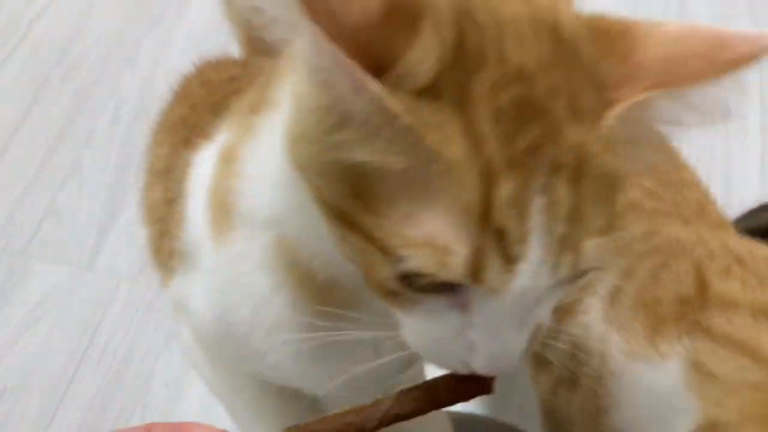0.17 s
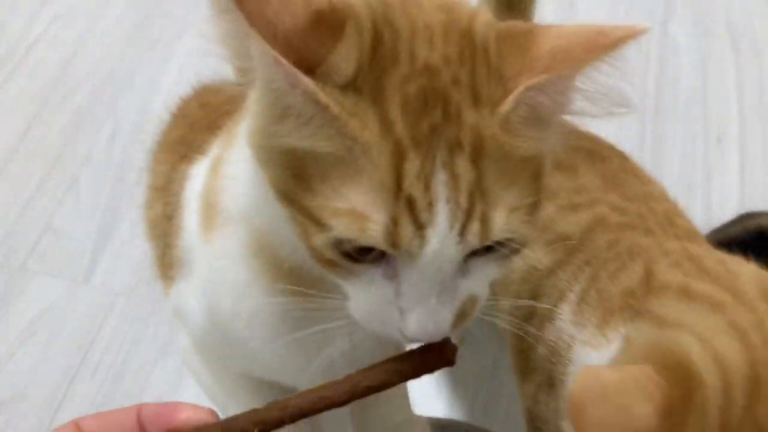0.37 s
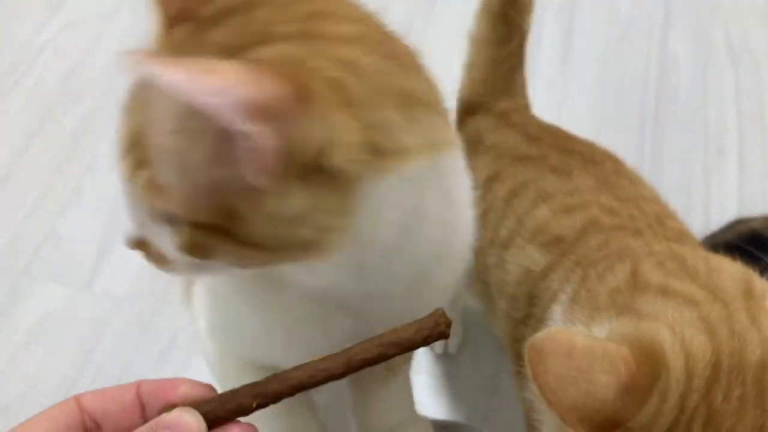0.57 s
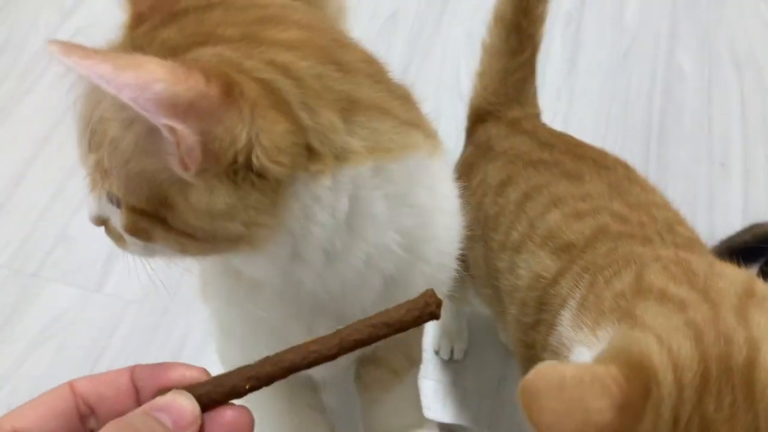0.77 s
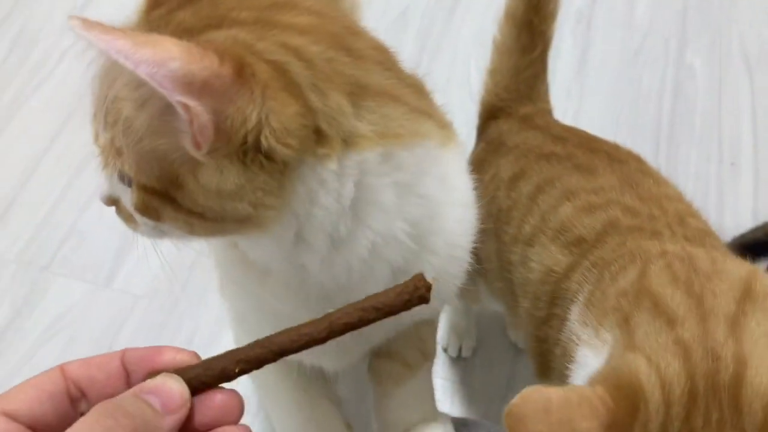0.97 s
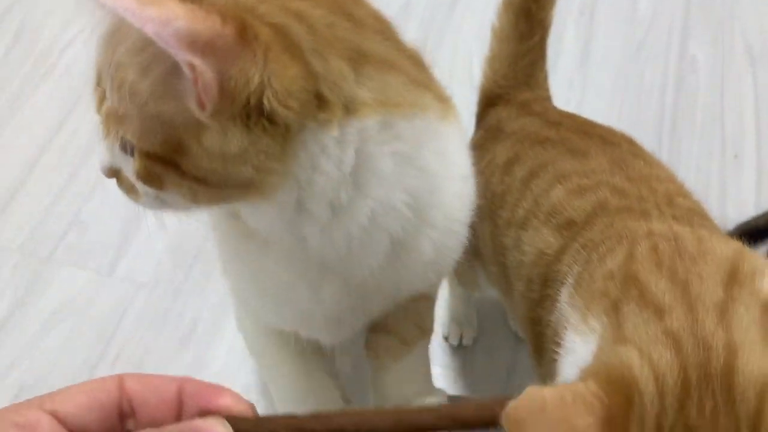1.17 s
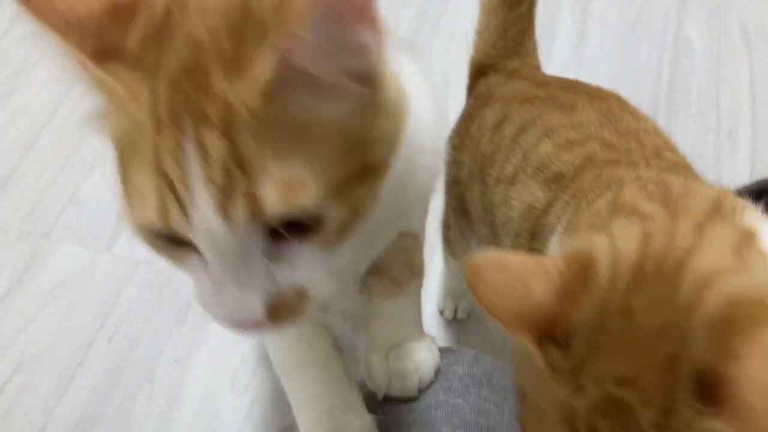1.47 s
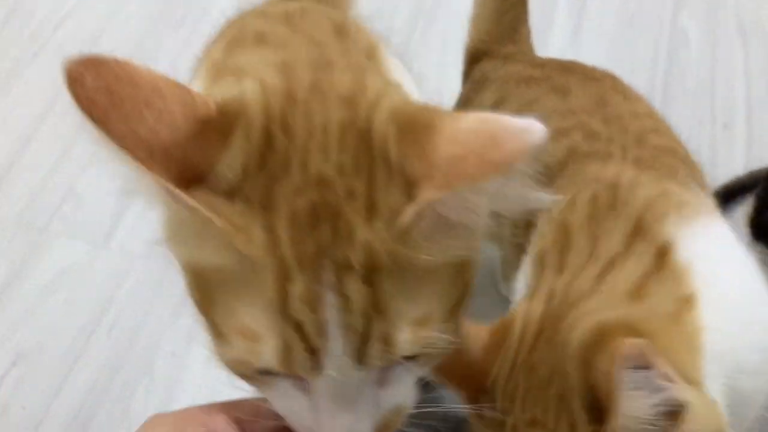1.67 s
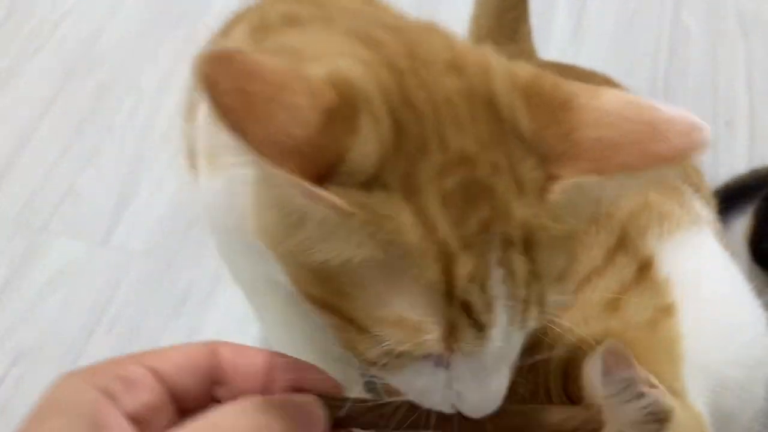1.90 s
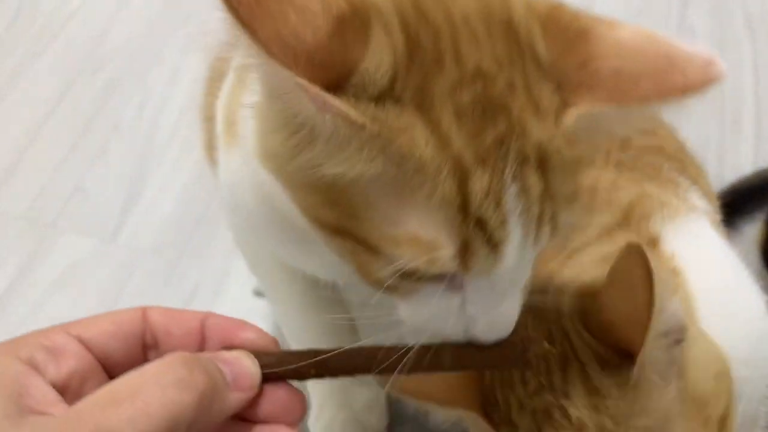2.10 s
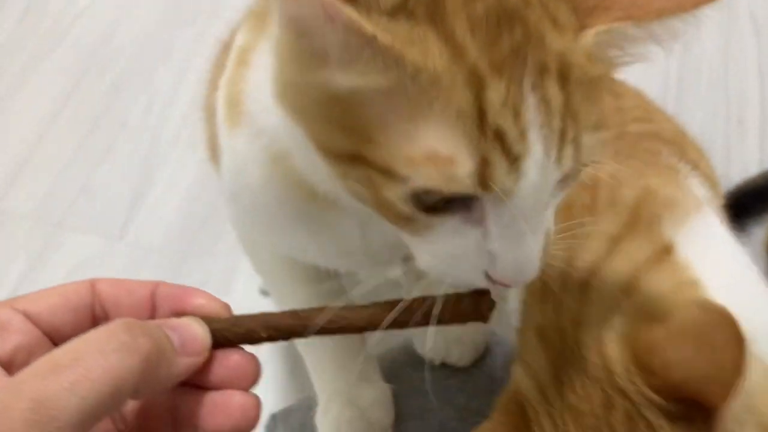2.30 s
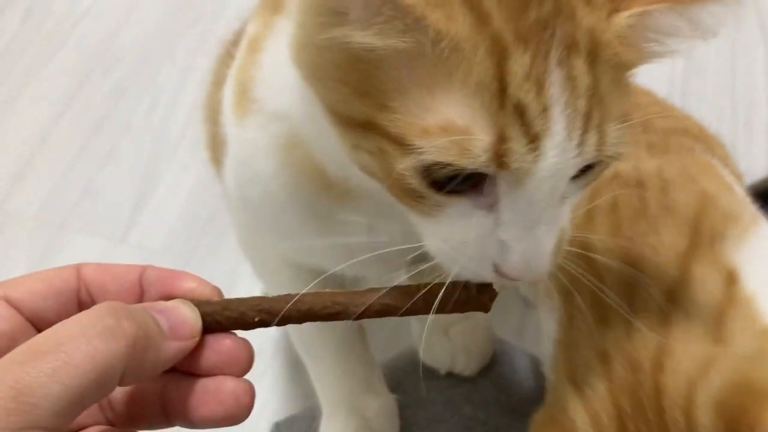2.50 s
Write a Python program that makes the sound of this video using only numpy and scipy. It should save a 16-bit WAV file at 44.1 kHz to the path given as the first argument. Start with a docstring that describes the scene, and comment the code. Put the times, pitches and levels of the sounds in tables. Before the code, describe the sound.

A kitten gnaws a hard treat stick close to a handheld phone in a bare, echoing room. A sharp crack with crumbs comes at 0.22 s, a hollow distant clunk and scuff at 0.4 s fades slowly. Quiet smacks follow, clearest at 1.25 s; low bumps thud from 1.25 to 2.2 s, with light fur rustle. Crunchy snaps cluster at 2.23-2.36 s, then a soft tick at 2.54 s over low rumble.

```python
"""In a bare, ringing room a kitten gnaws a hard treat stick close to a hand-held phone.
Bites are sharp snaps with crumbling noise, smacks are short mouth rings, crumbs are showers of clicks.
Fur brushes past as swells of noise; bumps on the phone and nudges of the stick are soft swings.
Something farther off clunks and scuffs, made of ringing and coloured noise that fades slowly.
A noise tail with a few standing waves is the room's echo; a low noise rumble lies underneath."""
import sys
import numpy as np
from scipy import signal
from scipy.fft import rfft, irfft
from scipy.io import wavfile
from scipy.ndimage import uniform_filter1d

SR = 44100
rng = np.random.default_rng(int(sys.argv[2]) if len(sys.argv) > 2 else 0)


def transcribe(signal):
    """Save signal, clipped to [-1, 1], as a 16-bit WAV file at the path in sys.argv[1]."""
    frames = np.atleast_2d(signal).T
    limited = np.clip(frames, -1, 1)
    pcm = np.round(limited * 32767).astype(np.int16)
    wavfile.write(sys.argv[1], SR, pcm)


N = 116865  # length in samples


def undb(db):
    """Turn decibels into a gain."""
    return 10 ** (np.asarray(db) / 20)


def unit(x):
    """Scale a sound to an average (rms) level of 1."""
    return x / np.sqrt(np.mean(x ** 2) + 1e-24)


def along(points, hz):
    """Read a curve of (pitch_hz, value) points, with pitch on a log scale."""
    p = np.array(points, float)
    return np.interp(np.log(hz + 1), np.log(p[:, 0]), p[:, 1])


def freqs(x):
    """List the frequencies in the spectrum of x."""
    return np.fft.rfftfreq(x.shape[-1], 1 / SR)


def colour(x, points):
    """Make pitches louder or softer along a (pitch_hz, level_db) curve."""
    gain = undb(along(points, freqs(x)))
    return irfft(rfft(x) * gain, x.shape[-1])


def resonate(x, hz, width):
    """Pass x through one resonance twice, so that other pitches fall away steeply."""
    b, a = signal.iirpeak(hz, hz / width, fs=SR)
    once = signal.lfilter(b, a, x)
    return signal.lfilter(b, a, once)


def fade(age, t60_s):
    """Die away by 60 dB in t60_s seconds."""
    return np.exp(-np.log(1000) * age / t60_s)


def swell(t, at_s, half_s):
    """Rise and fall smoothly around at_s."""
    return np.exp(-((t - at_s) / half_s) ** 2 / 2)


def swing(age, hz, cycles):
    """A soft push that swings for about a cycle, with no click."""
    return np.cos(2 * np.pi * hz * age) * np.exp(-(hz * age / cycles) ** 2 / 2)


def grain(depth_db, size):
    """A gain that flickers at random, smoothed over size samples."""
    wander = uniform_filter1d(rng.standard_normal(N), size=size)
    return unit(undb(depth_db * unit(wander)))


def add(out, x, start_s):
    """Mix x into out from a given time."""
    i = max(int(start_s * SR), 0)
    part = x[:, :max(N - i, 0)]
    out[:, i:i + part.shape[1]] += part


# how unlike left and right are in spread-out noise: pitch_hz, share (0-1)
STEREO_SPREAD = [(150, 0.07), (300, 0.34), (700, 1), (4000, 0.67), (5200, 0.18), (16000, 0)]


def stereo_noise(width, size):
    """Left and right noise: the same at width 0, less alike as width grows, nearly alike at both extremes."""
    mid, side = rng.standard_normal((2, size))
    side = irfft(rfft(side) * along(STEREO_SPREAD, freqs(side)), size)
    return unit(np.array([mid + width * side, mid - width * side]))


# shape of the steady background: pitch_hz, relative level_db
RUMBLE_COLOUR = [(20, -16), (45, -9), (68, -1.5), (110, -3.5), (170, -12.5), (270, -12.5), (450, -26.5),
                 (1000, -36.5), (3000, -42), (5300, -46), (8000, -47.5), (11500, -51), (14500, -49)]
RUMBLE_DB, RUMBLE_WIDTH = -45.5, 0.98


def room_rumble():
    """Steady noise, strongest in the lows."""
    noise = stereo_noise(RUMBLE_WIDTH, size=N)
    return undb(RUMBLE_DB) * unit(colour(noise, RUMBLE_COLOUR))


# fur brushing the stick and hand: middle_s, half_length_s, rustle_level_db, hiss_level_db
FUR_BRUSHES = [(0.029, 0.061, -55.5, -78), (0.153, 0.03, -56, -53), (1.749, 0.035, -50.5, -49),
               (1.895, 0.029, -52.5, -55.5), (1.58, 0.12, -56, -74), (1.996, 0.077, -54, -57),
               (2.161, 0.046, -48, -46.5), (2.64, 0.059, -53.5, -57)]
# soft rustle in a brush: pitch_hz, relative level_db
RUSTLE_COLOUR = [(200, -32.5), (500, -1), (1500, 0), (3200, 0.5), (4500, -0.5), (6000, -8), (16000, -25)]
# finer hiss in a brush: pitch_hz, relative level_db
HISS_COLOUR = [(1000, -40), (4000, 0), (5800, 10), (7500, 4), (9500, -8), (11500, -16.5), (14000, 3),
               (16000, -14)]
BRUSH_GRAIN_DB = 1.5  # depth of the flicker


def fur(t):
    """Hairs rub past in swells of fine, grainy friction."""
    flicker = grain(BRUSH_GRAIN_DB, size=200)
    rustle = unit(colour(stereo_noise(0.56, size=N) * flicker, RUSTLE_COLOUR))
    hiss = unit(colour(stereo_noise(0.4, size=N) * flicker, HISS_COLOUR))
    out = np.zeros((2, N))
    for at_s, half_s, rustle_db, hiss_db in FUR_BRUSHES:
        friction = undb(rustle_db) * rustle + undb(hiss_db) * hiss
        out += swell(t, at_s, half_s) * friction
    return out


# cracks and ticks of the teeth, levels before the shared colour below:
# start_s, jaw_db, mouth_db, stick_db, tooth_db, crackle_db
TOOTH_BITES = [ (0.132, -50, -42.5, -50, -50, -48), (0.2218, -45, -28, -23.5, -17.5, -19),
               (0.223, -39, -26.5, -15, -29, -24), (0.2267, -29, -22, -13, -35, -22),
               (.326, -44, -45, -40, -64, -65), (.432, -31.5, -26, -37, -51, -79),
               (.557, -35, -60.5, -53, -65, -79), (1.12, -41.5, -34, -44, -63, -79),
               (1.251, -37.5, -40.5, -41.5, -36, -42.5), (1.464, -60, -46.5, -52, -66, -75),
               (1.516, -41, -46, -52, -56.5, -60), (1.75, -41, -40, -61, -48, -51),
               (1.822, -45, -45, -47.5, -50.5, -74), (1.944, -43.5, -50, -58, -47.5, -85),
               (2.171, -44, -38.5, -45, -64, -42), (2.182, -44, -39.5, -48, -62, -68),
               (2.2265, -43, -28, -33.5, -35, -79), (2.269, -32.5, -46, -32.5, -36, -33),
               (2.289, -63, -26, -20.5, -19, -46), (2.2912, -26.5, -27.5, -21.5, -38, -11.5),
               (2.3051, -33, -49, -21, -29, -44.5), (2.336, -40.5, -35, -21.5, -27, -26),
               (2.3367, -31.5, -20, -19.5, -24.5, -33), (2.3584, -46, -23, -23.5, -22, -24),
               (2.539, -51, -34, -37.5, -47, -60), (2.544, -43.5, -34, -38.5, -49, -75), ]
# where those five levels lie, from jaw to crackle: centre_hz, width_hz
BITE_RANGES = [(400, 546), (1200, 1920), (3200, 3000), (7000, 7700), (14000, 8700)]
# resonances and hollows that all bites share: pitch_hz, level_db
SHARED_BITE_COLOUR = [(80, -17.5), (200, -7.5), (320, 2.5), (600, -2.5), (1000, -0.5), (2200, -4.5),
                      (3000, -1.5), (4300, -2.5), (5200, 3.5), (6300, 4), (11500, -4.5), (13700, -3),
                      (16000, -11.5)]
BITE_DB, LEVEL_WINDOW_S = 1, 0.0052  # added level; time over which a bite's level is counted
BITE_WIDTH = 0.56  # how unlike left and right are
CRUMBLE_MS, CRUMBLE = 0.67, 0.32  # tiny fractures go on after the snap: fade time, gain
# faint noise rising into the snap and fading after it: level against the crumbling, fade time
FAINT_NOISE_DB, FAINT_NOISE_MS = -27, 4.7
SOFT_DB, SOFT_CRUMBLE = -32.5, 0.51  # ticks weaker than this get an extra scrape of this gain
SNAP_EVENNESS = 0.48  # 1 = a perfectly even spectrum before the copy is added
SNAP_COPY, SNAP_COPY_MS = 0.31, 0.8  # inverted copy after each snap: gain, typical delay
LATE_MS, LATE_HZ = 7.525, 310.5  # the lows lag by this much; the lag is halved at this pitch


def bites():
    """Teeth snap and crumble the stick; stick and jaw ring, and the low pitches arrive later."""
    out, size, lead = np.zeros((2, N)), 3072, 1024  # lead = samples kept before the snap
    ms = (np.arange(size) - lead) / SR * 1000
    hz = freqs(ms)
    lag = np.exp(-2j * np.pi * LATE_MS / 1000 * LATE_HZ * np.log1p(hz / LATE_HZ))
    crumble = (ms >= 0) * np.exp(-abs(ms) / CRUMBLE_MS)
    faint_noise = undb(FAINT_NOISE_DB) * np.exp(-abs(ms) / FAINT_NOISE_MS)
    grit = CRUMBLE * (crumble + faint_noise)
    soft_scrape = SOFT_CRUMBLE * np.exp(-abs(ms - CRUMBLE_MS) / (2 * CRUMBLE_MS))
    click = ms == 0
    for start_s, *levels in TOOTH_BITES:
        is_soft = max(levels) < SOFT_DB
        noise = (grit + soft_scrape * is_soft) * stereo_noise(BITE_WIDTH, size=size)
        snap = rfft(noise + click)
        snap = snap / np.mean(abs(snap) ** 2, axis=0) ** (SNAP_EVENNESS / 2)
        # an inverted copy follows at a random short delay, so each bite is coloured differently
        delay_s = SNAP_COPY_MS / 1000 * rng.uniform(0.5, 2)
        snap = snap * (1 - SNAP_COPY * np.exp(-2j * np.pi * hz * delay_s))
        snap = snap / np.sqrt(np.mean(abs(snap) ** 2))
        # a wide range shares its level among more pitches
        density = [(centre, db - 10 * np.log10(width))
                   for (centre, width), db in zip(BITE_RANGES, levels)]
        curve_db = along(density, hz) + along(SHARED_BITE_COLOUR, hz) + BITE_DB
        gain = undb(curve_db) * SR * np.sqrt(LEVEL_WINDOW_S / 2)
        add(out, irfft(snap * gain * lag, size), start_s - lead / SR)
    return out


# wet smacks of the opening mouth: start_s, pitch_hz, level_db
MOUTH_SMACKS = [(.134, 1360, -42.5), (0.797, 995, -34), (1.111, 1140, -33), (1.1205, 2815, -35.5),
                (1.122, 1070, -34), (1.2539, 948, -23.5), (1.465, 1260, -38.5), (1.518, 1090, -35),
                (1.749, 1244, -36), (1.891, 1450, -40.5), (1.943, 1346, -41.5), (2.179, 1035, -36),
                (2.2273, 1050, -25), (2.268, 1275, -27), (2.361, 1430, -24), (2.541, 1178, -26.5)]
SMACK_ATTACK_S, SMACK_T60_S = 0.00061, 0.024  # rise time; time to fade by 60 dB
SMACK_OVERTONE, SMACK_OVERTONE_DB = 1.4, -24  # second tone: times the pitch, level against the first
SMACK_SAG, SMACK_SAG_S = 0.15, 0.0026  # the ring starts this share sharp and settles this fast
SMACK_NOISE = 0.78  # rms level of wet noise beside a ring of peak 1


def smacks():
    """Lips and tongue part and the mouth cavity rings briefly, its pitch sagging."""
    out, age = np.zeros((2, N)), np.arange(2048) / SR
    shape = (1 - np.exp(-age / SMACK_ATTACK_S)) * fade(age, SMACK_T60_S)
    sag = SMACK_SAG * SMACK_SAG_S * (1 - np.exp(-age / SMACK_SAG_S))
    for start_s, hz, db in MOUTH_SMACKS:
        noise = stereo_noise(BITE_WIDTH, size=len(age))
        wet = SMACK_NOISE * unit(resonate(noise, hz, hz))
        phase = 2 * np.pi * hz * (age + sag)
        ring = np.sin(phase) + undb(SMACK_OVERTONE_DB) * np.sin(SMACK_OVERTONE * phase)
        add(out, undb(db) * shape * (ring + wet), start_s)
    return out


# colour of the room's echo: pitch_hz, level_db
ROOM_COLOUR = [(100, -20), (290, -3), (500, -5.5), (1000, -6), (1600, -4), (2300, -6), (4400, -8.5),
               (5600, -12.5), (7000, -8.5), (11000, -15), (13300, -14), (16000, -17.5)]
# how long each pitch takes to fade by 60 dB: pitch_hz, t60_s
ROOM_FADE = [(200, 0.7), (1000, 0.61), (3500, 0.64), (7000, 0.62), (14000, 0.3)]
# standing waves of the room: pitch_hz, level_db, t60_s
STANDING_WAVES = [(283.4, -15.5, 1), (311, -11.5, 0.53), (386.5, -15.5, 0.46)]
ROOM_ONSET_S, ROOM_WIDTH = 0.0009, 0.67
ROOM_GRAIN_DB = 0.5  # reflections arrive in uneven clusters


def room(x):
    """Hard floor and walls scatter sound into a tail with standing waves; the high treble dies first."""
    noise = stereo_noise(ROOM_WIDTH, size=SR) * grain(ROOM_GRAIN_DB, size=200)[:SR]
    hz, age, cells = signal.stft(noise, SR, nperseg=256)  # split into pitches and moments
    rate = np.log(1000) / along(ROOM_FADE, hz)[:, None]
    shape = np.sqrt(2 * rate / SR) * np.exp(-rate * age) * (1 - np.exp(-age / ROOM_ONSET_S))
    tail = signal.istft(cells * shape * undb(along(ROOM_COLOUR, hz))[:, None], SR)[1]
    t = np.arange(tail.shape[1]) / SR
    for mode_hz, db, t60_s in STANDING_WAVES:
        wave = np.sin(2 * np.pi * mode_hz * t) * fade(t, t60_s)
        tail = tail + undb(db) * mode_hz / SR * wave
    mono = x.mean(axis=0)[None]
    return signal.fftconvolve(mono, tail, axes=1)[:, :N]


# soft bumps on the phone: middle_s, pitch_hz, level_db, dull_knock_level_db
PHONE_BUMPS = [ (0.186, 49.74, -38, -54), (1.247, 39.2, -29, -44.5), (1.276, 58.5, -28, -43),
               (1.295, 57.5, -27.5, -58), (1.372, 40.2, -28, -49), (1.424, 64.5, -25.5, -39.5),
               (1.467, 56.2, -21, -40), (1.483, 60, -32, -30), (1.515, 60, -27, -29),
               (1.542, 37.4, -19.5, -47), (1.614, 44, -25.5, -44), (1.663, 90.5, -22.5, -30),
               (1.689, 72, -22.5, -34.5), (1.706, 69.5, -24, -51), (1.788, 49.7, -16, -32),
               (1.818, 84, -25.5, -24), (2.023, 40, -24, -50), (2.05, 63.4, -20, -37),
               (2.124, 41.6, -24.5, -45), (2.215, 41, -24.5, -50), ]
BUMP_CYCLES, KNOCK_HZ = 0.6, 139.6  # length of a swing in cycles; pitch of the dull knock


def bumps(t):
    """Each bump shakes the phone in one low swing with a dull knock inside it."""
    out = np.zeros(N)
    for at_s, hz, db, knock_db in PHONE_BUMPS:
        out += undb(db) * swing(t - at_s, hz, BUMP_CYCLES)
        out += undb(knock_db) * swing(t - at_s, KNOCK_HZ, BUMP_CYCLES)
    return out


# crumbs breaking around hard bites: middle_s, half_length_s, level_db (before spread and colour)
CRUMB_SHOWERS = [(0.257, 0.036, -25.5), (2.319, 0.026, -13.5)]
# sound of the crumbs: pitch_hz, level_db
CRUMB_TONE = [(150, -14), (330, -6), (700, 0), (1500, -1), (4200, 4), (5500, -8), (14000, -15)]
CRUMBS_PER_S, CRUMB_SPREAD_DB = 280, 19


def crumbs(t):
    """Tiny fractures click at random times and strengths in short showers."""
    happens = rng.random(N) < CRUMBS_PER_S / SR
    strength = undb(CRUMB_SPREAD_DB * rng.uniform(-1.2, 1, N))
    direction = np.sign(rng.standard_normal(N))
    showers = sum(undb(db) * swell(t, at_s, half_s) for at_s, half_s, db in CRUMB_SHOWERS)
    return colour(happens * strength * direction * showers, CRUMB_TONE)


# the far clunk's resonances: pitch_hz, width_hz (each of two passes), level_db, entry_after_start_s
CLUNK_RESONANCES = [(281, 51, -44.5, 0.024), (389, 32, -51.5, 0.023), (612, 55, -35.5, 0.035),
                    (713, 62, -39, 0.0035), (820, 160, -45.5, 0)]
# the scuff that goes with it: pitch_hz, relative level_db
SCUFF_COLOUR = [(120, -18.5), (300, 4), (800, -5.5), (1400, -0.5), (2300, -4.5), (3300, -3.5), (4300, -9),
                (5500, -25), (16000, -54.5)]
CLUNK_S, CLUNK_ATTACK_S, CLUNK_HOLD_S, CLUNK_T60_S = 0.4048, 0.0082, 0.0063, 0.72
SCUFF_DB, SCUFF_HOLD_S, SCUFF_T60_S = -36.5, 0.13, 0.77
CLUNK_WIDTH, SCUFF_GRAIN_DB = 0.62, 1.5  # stereo width; depth of the flicker


def far_clunk(t):
    """A hollow body farther off is nudged and scuffs, its ring fading slowly; most of its lower resonances
    enter later."""
    def envelope(entry_s, hold_s, t60_s):
        """Rise, hold, then fade."""
        age = t - CLUNK_S - entry_s
        fading_for = np.maximum(age - CLUNK_ATTACK_S - hold_s, 0)
        return np.clip(age / CLUNK_ATTACK_S, 0, 1) * fade(fading_for, t60_s)

    body = np.zeros((2, N))
    for hz, width, db, entry_s in CLUNK_RESONANCES:
        ring = unit(resonate(stereo_noise(CLUNK_WIDTH / 2, size=N), hz, width))
        body += undb(db) * ring * envelope(entry_s, CLUNK_HOLD_S, CLUNK_T60_S)
    friction = stereo_noise(CLUNK_WIDTH, size=N) * grain(SCUFF_GRAIN_DB, size=250)
    scuff = undb(SCUFF_DB) * unit(colour(friction, SCUFF_COLOUR))
    return body + scuff * envelope(0, SCUFF_HOLD_S, SCUFF_T60_S)


# dull knocks as the stick is nudged or gives way: middle_s, pitch_hz, level_db
STICK_NUDGES = [(1.7317, 506, -23.5), (1.7437, 326, -30), (2.2958, 830, -20), (2.3401, 374, -16.5)]
NUDGE_CYCLES, NUDGE_ROOM_DB = 0.73, -6.5  # swing length; less of a knock carries into the room


def nudges(t):
    """The stick gives padded taps: short swings with no click in them."""
    return sum(undb(db) * swing(t - at_s, hz, NUDGE_CYCLES) for at_s, hz, db in STICK_NUDGES)


# lag of the right microphone behind the left: pitch_hz, lag_radians
MICROPHONE_LAG = [(300, .1), (1000, .7), (3000, 1.2), (4300, 1.4), (5350, 3.14), (9500, 7.1), (11500, 9.42),
                  (14500, 12.4)]


def microphone_lag(x):
    """The right microphone lags the left by a phase that grows with pitch."""
    left, right = x
    turn = np.exp(-1j * along(MICROPHONE_LAG, freqs(x)))
    return np.array([left, irfft(rfft(right) * turn, N)])


def scene():
    """Kitten close by, the room around it, bumps on the phone itself."""
    t = np.arange(N) / SR
    mouth = bites() + smacks() + crumbs(t)
    knocks = nudges(t)
    echo = room(mouth + undb(NUDGE_ROOM_DB) * knocks)
    rumble = room_rumble()
    near = mouth + knocks + fur(t) + bumps(t)
    return microphone_lag(near + echo + far_clunk(t) + rumble)


TOP_HZ = 16100  # highest pitch let through


def record(dry):
    """The phone clips at full scale and cuts the top of the treble."""
    low_pass = signal.ellip(8, 0.2, 70, TOP_HZ, fs=SR, output="sos")
    return signal.sosfilt(low_pass, np.clip(dry, -1, 1))


dry = scene()
out = record(dry)
transcribe(out)
```